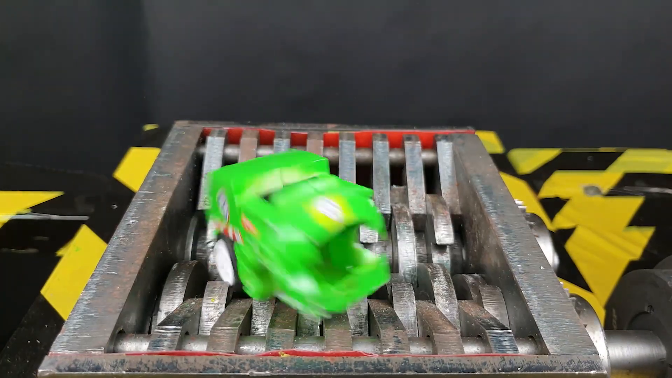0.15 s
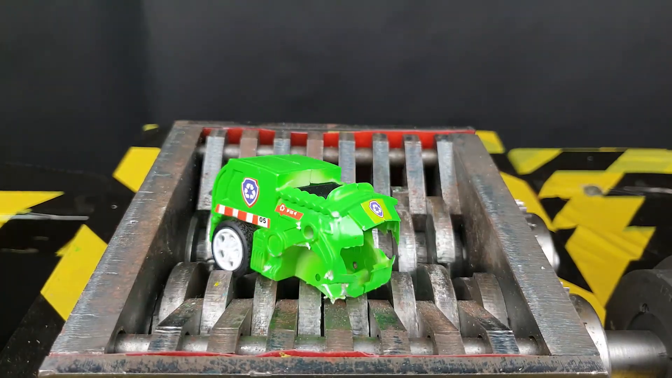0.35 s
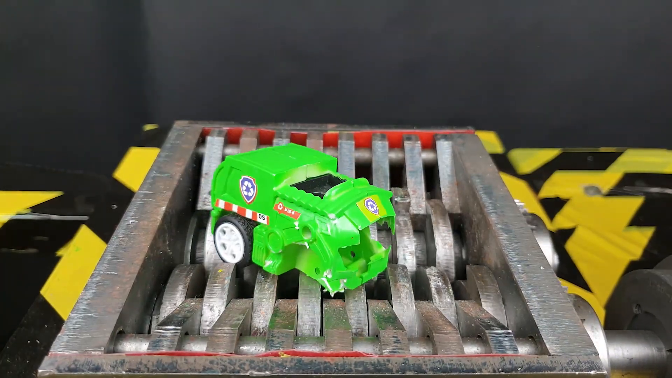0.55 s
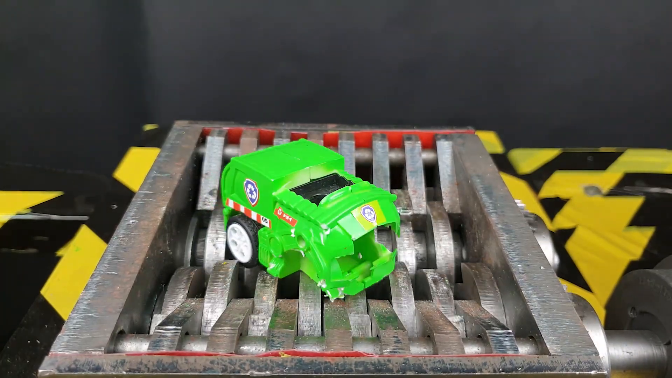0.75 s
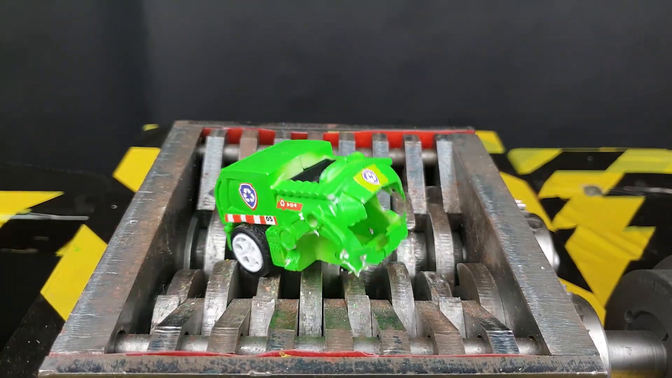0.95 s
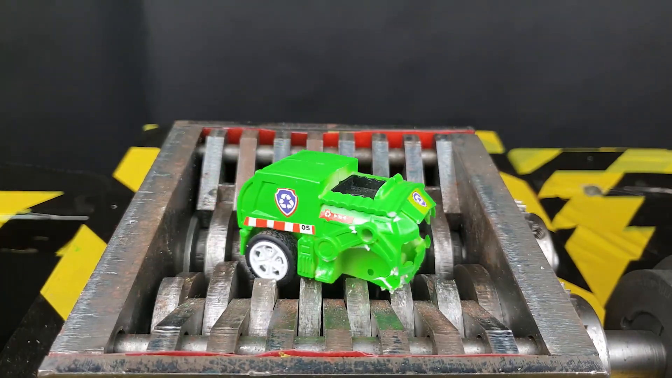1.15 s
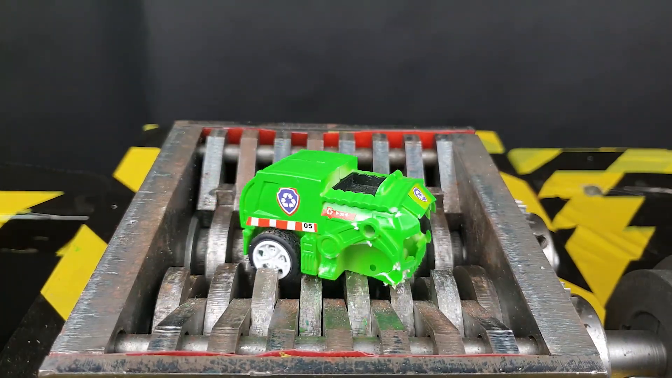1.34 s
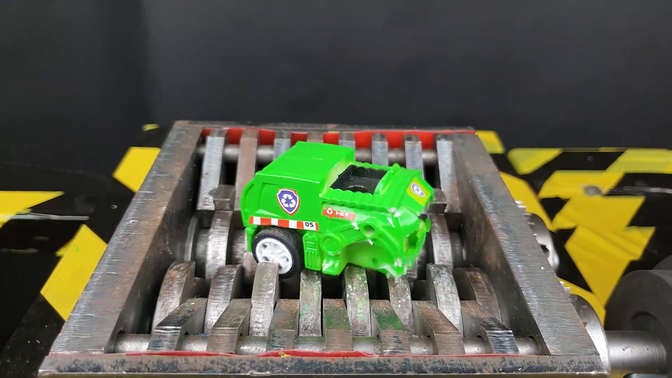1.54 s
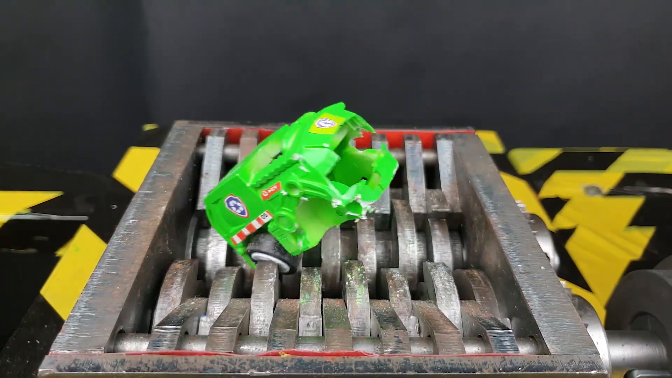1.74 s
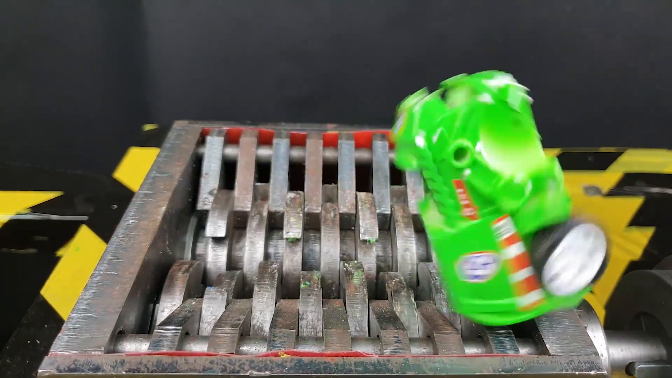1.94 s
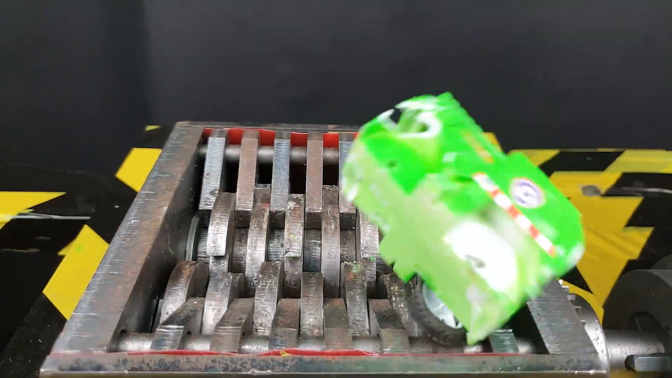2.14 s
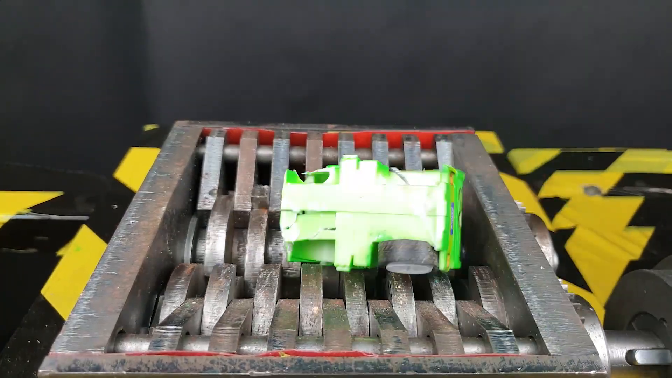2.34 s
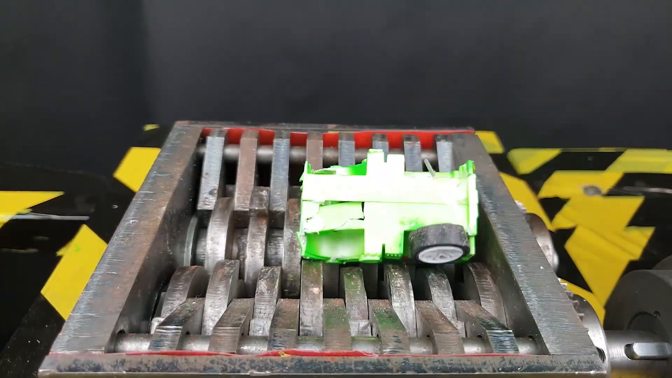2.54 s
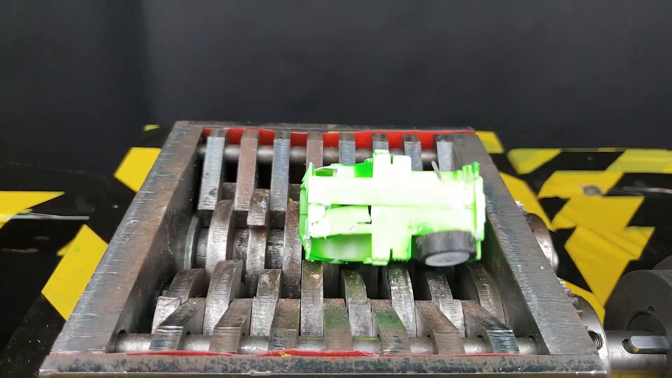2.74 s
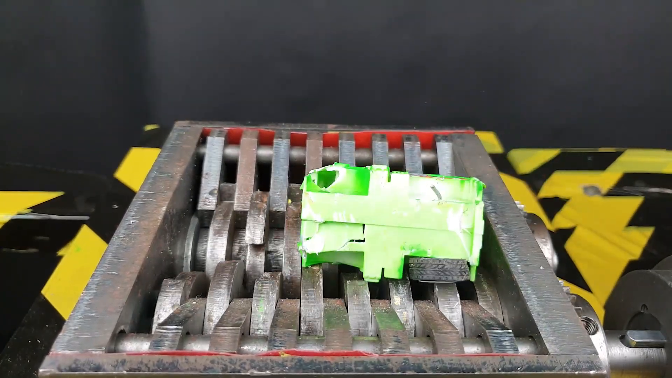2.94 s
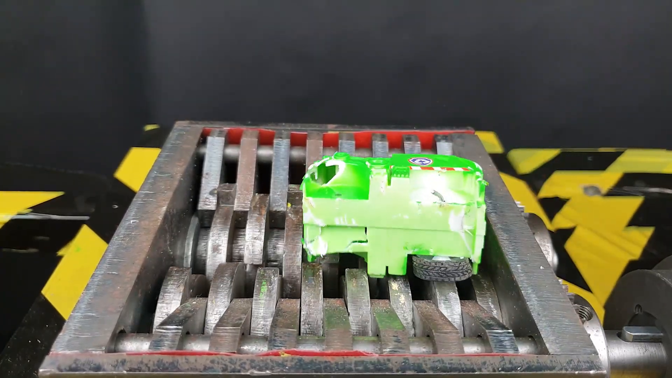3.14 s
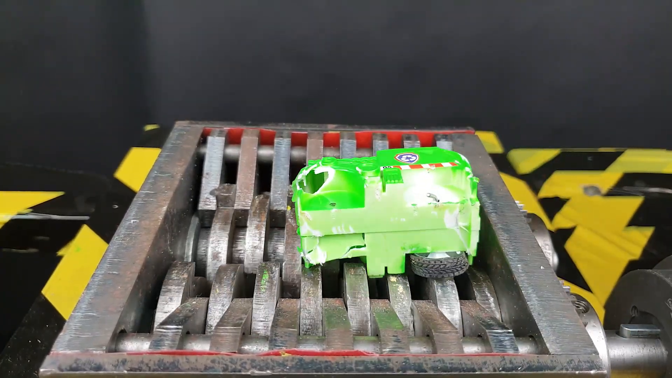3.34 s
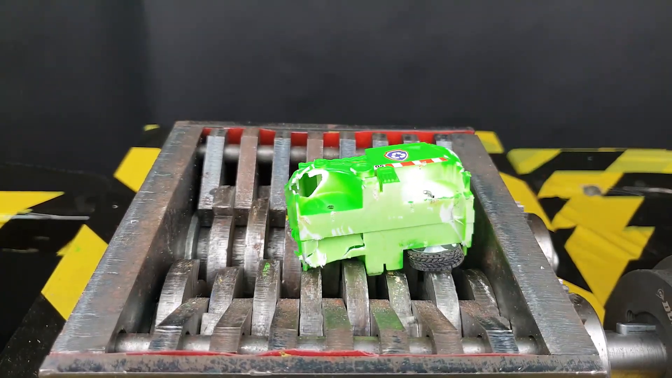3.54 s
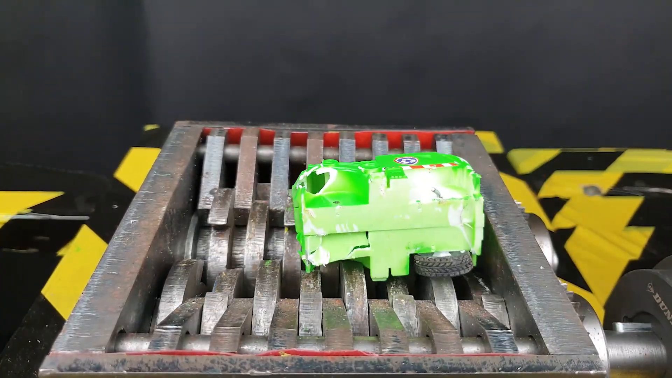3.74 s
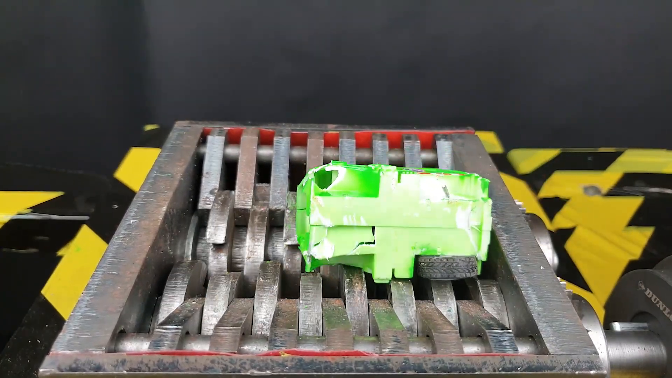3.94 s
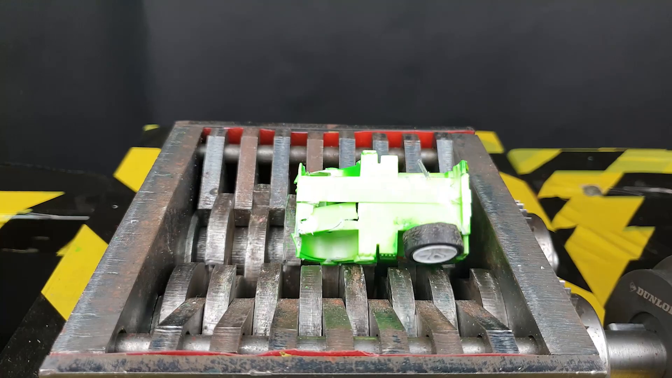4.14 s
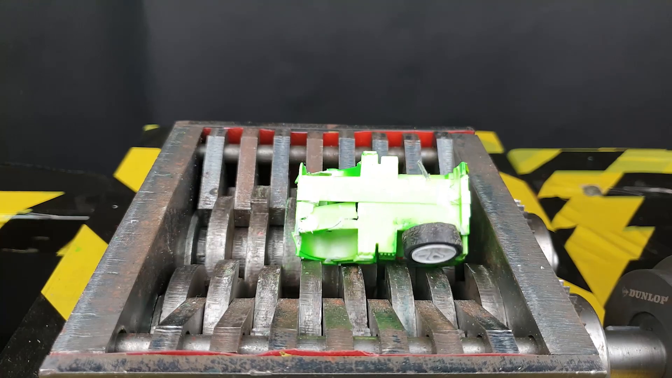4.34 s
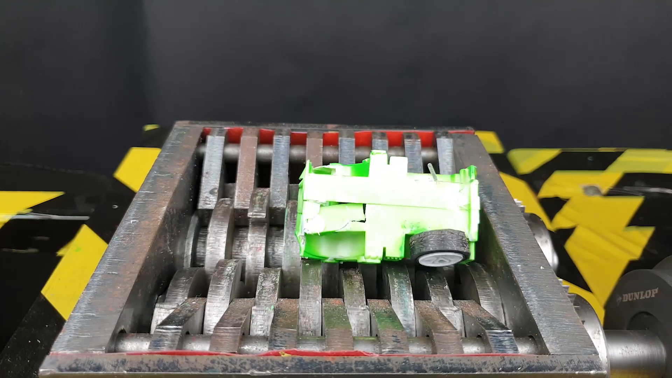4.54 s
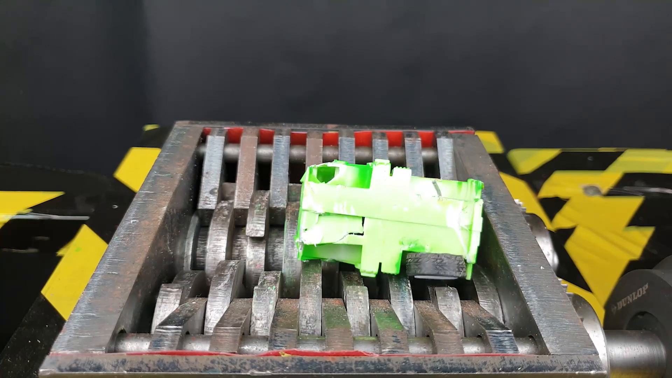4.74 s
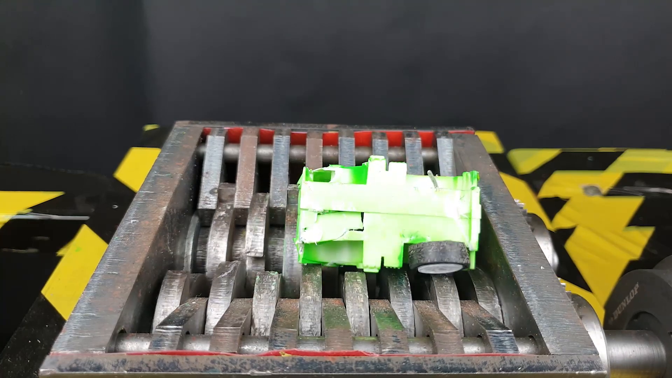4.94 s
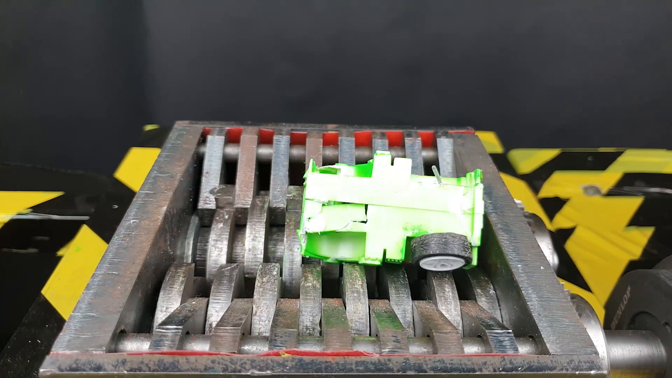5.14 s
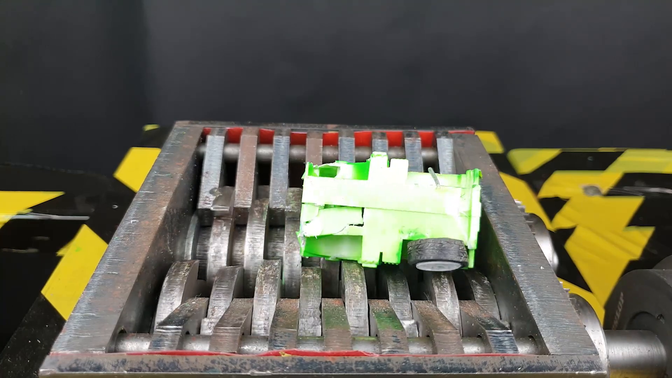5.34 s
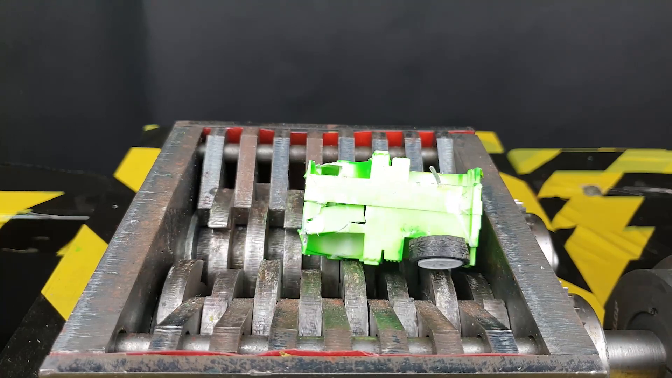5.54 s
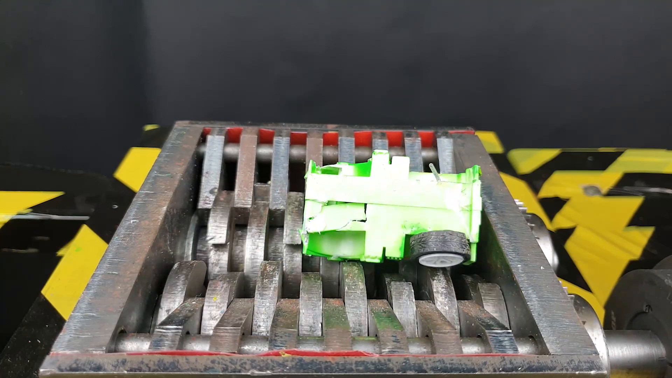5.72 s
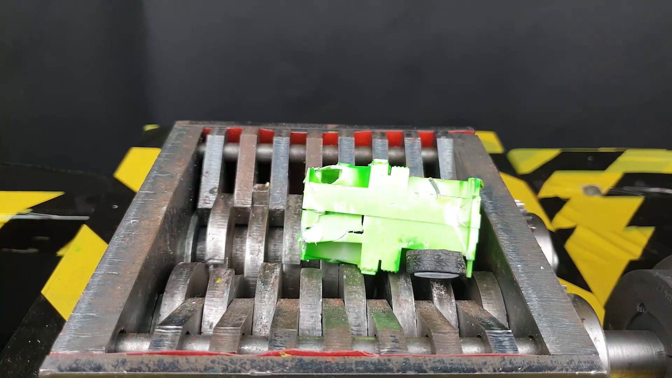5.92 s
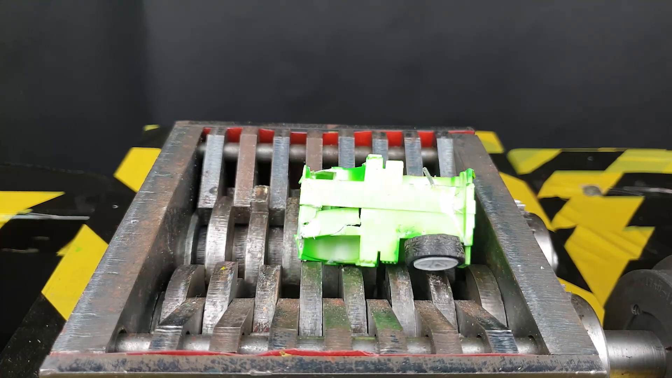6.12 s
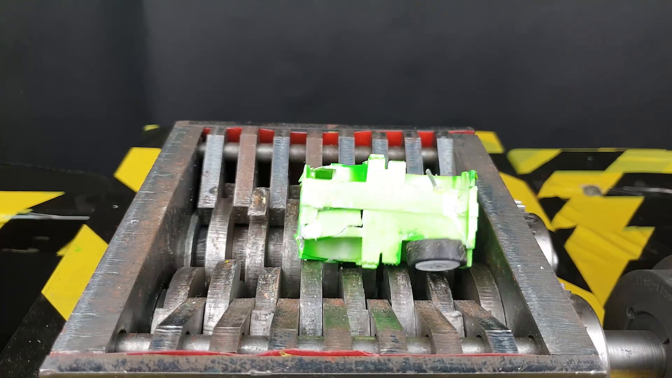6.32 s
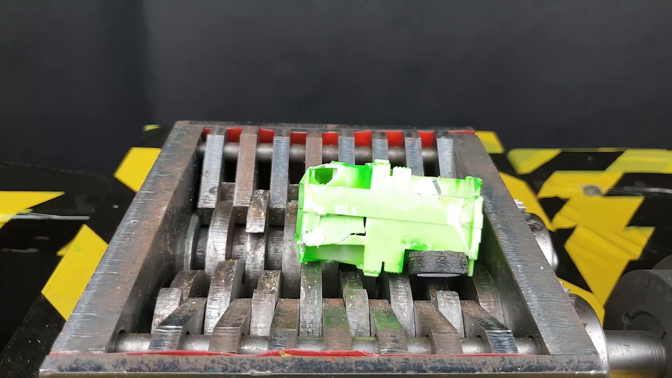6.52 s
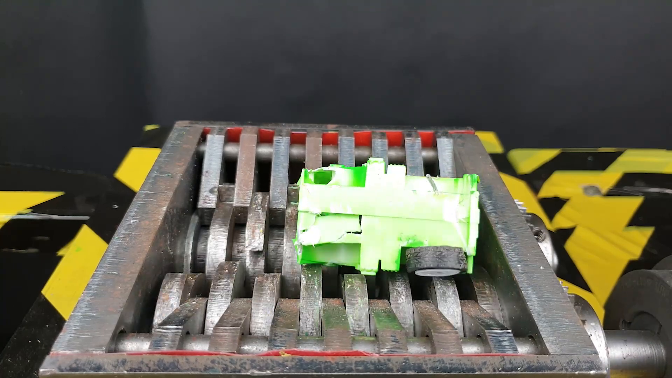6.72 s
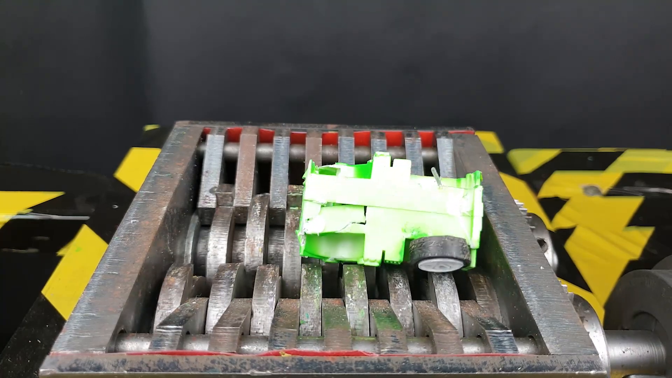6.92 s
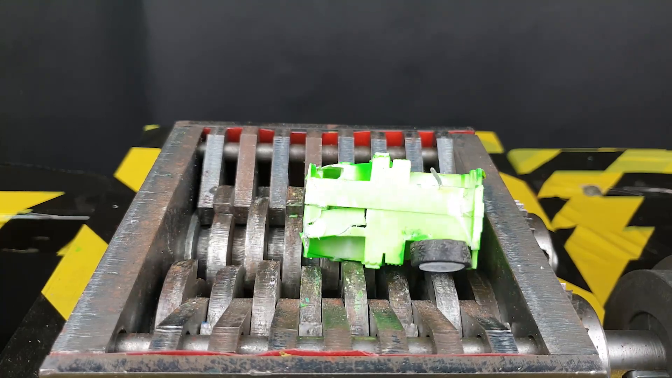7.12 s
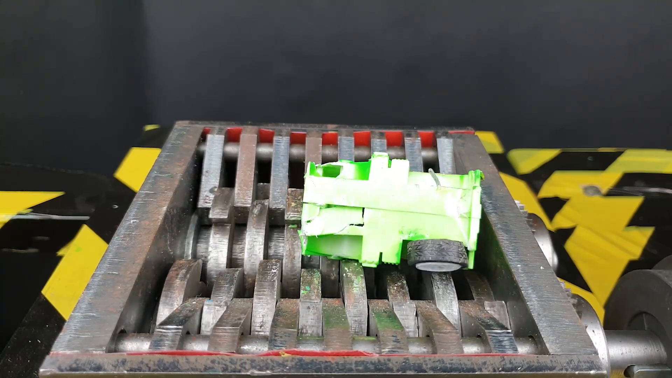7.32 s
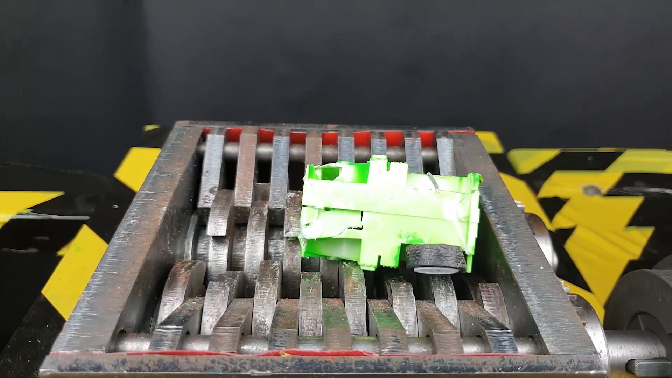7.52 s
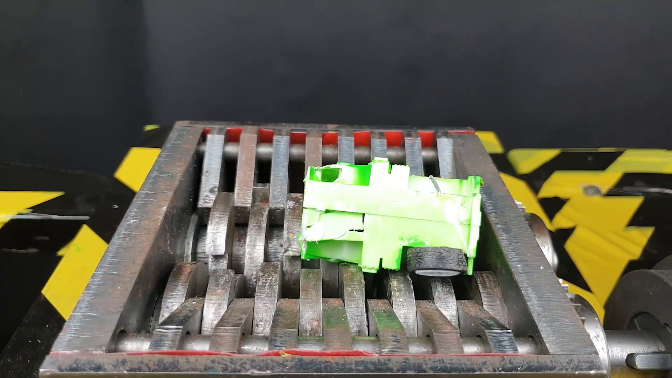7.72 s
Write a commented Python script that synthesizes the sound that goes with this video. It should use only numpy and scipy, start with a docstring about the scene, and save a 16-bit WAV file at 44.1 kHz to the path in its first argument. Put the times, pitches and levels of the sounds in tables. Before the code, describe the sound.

Hollow plastic snaps and clatters on slow steel cutters, loudest about two seconds in, then rubs and ticks over a droning, throbbing gearbox.

```python
"""A hollow plastic toy rides on the slow cutters of a twin-shaft shredder in a small workshop, 7.9 s.
Throughout, the motor hums, the gearbox throbs once a motor turn, and teeth rub the shell: clicks through its modes.
A crack comes at 0.2 s, then the loudest bites at 1.8-2.5 s: bursts of fractures that set the steel ringing.
Lighter knocks and singing drags follow; from 4.5 s the drive runs under heavier load."""
import sys
import numpy as np
from scipy import signal
from scipy.fft import rfft, irfft, next_fast_len
from scipy.io import wavfile
from scipy.ndimage import uniform_filter1d, map_coordinates

SR = 44100
rng = np.random.default_rng(int(sys.argv[2]) if len(sys.argv) > 2 else 0)


def unload_audio(sound):
    """Save the sound as a 16-bit wav file, at the path given as the first command line argument."""
    columns = np.transpose(np.atleast_2d(sound))
    # keep every value between -1 and 1, then stretch to whole-number steps
    steps = np.round(np.clip(columns, -1, 1) * 32767)
    wavfile.write(sys.argv[1], SR, steps.astype(np.int16))


N = 347060
TIME_S = np.arange(N) / SR

# blows and cracks on the shell: t/s, rms level over 10 ms/dB, brightness/(dB/octave), thud/dB, crumbling time/s
SHELL_BLOWS = [(0.135, -39, -2, -3, 0.0046), (.181, -18, 4, 4.5, .004), (.1925, -26.5, 1.5, 18, 0.0094),
               (0.224, -33.5, 3, 15, 0.0085), (.239, -36, -2, 1, 0.0081), (0.313, -28.5, -0.5, -14, 0.0027),
               (0.3517, -36, 5, 13, 0.0016), (0.3802, -40.5, -6, -23, 0.0019), (0.7336, -38, -4, 2, 0.0024),
               (0.8417, -47, 3, 0, .003), (.876, -38.5, -4.5, 19, 0.0066), (0.9564, -47.5, -1, -11, 0.0017),
               (1.0944, -35, -2.5, -7, 0.0031), (1.103, -40, 5, 12, 0.0015), (1.1395, -42.5, 0, 5, 0.004),
               (1.464, -32.5, -1.5, 17.5, 0.011), (1.554, -37.5, -4.5, 1, 0.0018),
               (1.6059, -37.5, 4.5, 17, 0.0017), (1.799, -32, -2.5, 13, 0.0037),
               (1.8146, -13.5, 8.5, -1, 0.0012), (1.8335, -7.5, 6, 12, 0.0029), (1.842, -15, 5.5, 6, 0.01),
               (1.849, -19, 4, 12, .004), (1.914, -13, 3.5, -19, 0.0012), (1.925, -22.5, 2, 0, 0.0023),
               (1.992, -30, 1, 13, 0.0027), (2.0224, -32.5, -2, 17, 0.0034), (2.0464, -37, 6, 18.5, 0.0037),
               (2.1261, -36, 0.5, 12, 0.0022), (2.145, -46, 3.5, 9, 0.0018), (2.267, -17, 3, 7.5, .0015),
               (2.3328, -28, 1.7, 7, 0.0016), (2.362, -33, -0.5, 11, 0.002),
               (2.3816, -33.5, -1.5, -6, .0025), (2.4082, -30.5, -2.5, -10, .003),
               (2.449, -34, 1.5, -15, .002), (2.4733, -21, 4, -6, 0.0019), (2.4946, -33, 1, -12, 0.0023),
               (2.524, -45, 0, -8, 0.0016), (2.535, -36.5, 0, -18, 0.0014),
               (2.709, -41, -4.5, -2.5, 0.0058), (2.8056, -38, 0, -16, 0.0028),
               (2.848, -42.5, -0.5, -15, 0.00082), (2.892, -46, -3.5, 7, .003),
               (3.1796, -42.5, -3, 7, .0034), (3.241, -33, -1.5, 19, 0.011), (3.3423, -52, 4, -0.5, .003),
               (3.634, -41, -5, 0, 0.0059), (3.702, -44.5, -7, 2, .005), (4.0595, -36.5, -6, 7, 0.0032),
               (4.075, -34.5, -2, -14, 0.0067), (4.145, -31.5, -6.5, -15.5, 0.0066),
               (4.4103, -42, 1.5, -5.5, 0.0026), (4.4288, -42.5, -7, 1, 0.0082),
               (4.4974, -44, -13, 0, .006), (4.5769, -37.5, -23, -9, 0.0012),
               (4.6582, -38.5, -9, 2, 0.0083), (4.905, -35.5, -4, -14, 0.0068),
               (5.261, -40.5, 0, 3, 0.0027), (5.4452, -37.5, -2.5, 9, 0.0054),
               (5.815, -40, -4, -14, 0.0045), (5.919, -42, -5, -12, 0.0045),
               (6.0085, -35.5, -4.5, -9, 0.0067), (6.387, -39.5, -3, 5, .004),
               (6.432, -42.5, 0, 11, 0.0026), (6.724, -42, -2, -4, .002), (6.7392, -39.5, -2.5, -23, .0055),
               (7.091, -39.5, 0, 6, 0.0043), (7.1216, -39.5, -8, 1, 0.0029), (7.174, -40.5, -3, 5, 0.013)]
# blows that ring the cutters: t/s, level/dB
STEEL_BLOWS = [(0.183, -31), (1.816, -26.5), (1.836, -12), (1.913, -33), (2.267, -40.5), (2.474, -42)]
# modes of cutter discs, hopper and frame: f/Hz, level re blow/dB, t60/s
STEEL_MODES = [(58, -16, 0.24), (85, -22.5, 0.4), (151.2, -20, 0.53), (396, -13.5, 0.3), (826, -19, 0.45),
               (3478, -18.5, 0.17), (3930, -17, .14), (4130, -11.5, .12), (4330, -13.5, 0.11),
               (4525, -6, .15), (4809, -2.5, 0.12), (5274, -11, 0.1), (5293, -9.5, 0.16), (6240, -20, 0.17),
               (6650, -18.5, .15), (6913, -12.5, 0.13), (7070, -4, .19), (8281, -22, .16),
               (12400, -21.5, .14)]
# modes of the hollow toy, before the scatter of each blow: f/Hz, width/Hz, level re broad response/dB
SHELL_MODES = [(1126, 62, 4), (1536, 220, 5), (1760, 70, 0.5), (2910, 130, -1), (3715, 170, 5),
               (4250, 220, 6), (6580, 170, 2), (8550, 240, -1)]
# lowest shell modes, singing while dragged: f/Hz before bending, width/Hz, relative level/dB
SINGING_MODES = [(1093.5, 13, 2), (1290, 70, -9.5), (1545, 32, -5), (1730, 90, -9)]
# a tooth catches the toy and drags along it: start t/s, length/s, relative scrape/dB, relative singing/dB
DRAGS = [(0.083, 0.082, -55, -70), (0.732, .19, -50.5, -58), (1.094, 0.065, -55, -49.5),
         (1.301, 0.072, -51, -71), (1.475, .13, -48, -59), (1.637, 0.19, -52.5, -73), (1.95, .12, -57, -50),
         (2.344, .2, -45, -43), (2.776, 0.11, -51, -47.5), (3.019, .11, -52, -47.5),
         (3.212, 0.14, -52.5, -53), (3.446, 0.29, -52.5, -53.5), (4.017, 0.2, -55.5, -53.5),
         (4.418, 0.22, -49.5, -57), (4.738, .1, -46.5, -49), (5.221, 0.075, -55, -52),
         (5.416, 0.049, -49, -54), (5.899, 0.21, -49.5, -51.5), (6.128, 0.13, -47, -49),
         (6.373, .14, -47, -53.5), (6.558, 0.11, -46.5, -51), (6.705, 0.061, -50.5, -45),
         (6.97, .08, -51, -69), (7.054, 0.084, -47.5, -55), (7.267, 0.047, -53.5, -48),
         (7.689, 0.24, -43.5, -47.5)]
# broad spectra, relative: f/Hz, level/dB
KNOCK_COLOUR = [(25, -13), (90, -10.5), (220, -12), (400, -8.5), (800, 0.5), (1500, 0), (2150, -4),
                (2950, -2.5), (3800, -3), (5200, -8.5), (8000, -11), (12000, -23), (13800, -40),
                (16000, -40)]
SCRAPE_COLOUR = [(100, -19), (500, 1.5), (900, 0.5), (1300, 2.5), (1750, -4), (2200, -4.5), (3100, -3.5),
                 (4200, -9), (5200, -15), (8000, -22), (12000, -38.5), (14000, -41.5)]
FIZZ_COLOUR = [(1000, -32.5), (4500, -10), (6500, -1), (8300, 1), (10500, -8), (12800, -8), (13300, -22.5),
               (16000, -27.5)]
RATTLE_COLOUR = [(25, -23), (60, -12), (130, -14), (220, -8.5), (270, -3), (335, -7.5), (400, 1),
                 (490, -13.5), (590, 3), (700, -5), (1000, -11.5), (1700, -11.5), (4000, -16.5),
                 (5500, -37)]
RUMBLE_COLOUR = [(15, -12), (35, -5), (60, 3), (95, -0.5), (200, -5), (500, -19.5), (1500, -59.5)]
TOP_HISS_COLOUR = [(9000, -42.5), (14400, -24.5), (14800, -16.5), (15350, -12.5), (15570, 2.5),
                   (15800, -25.5)]
# motor and gear tones: f/Hz, rms level at reference load/dB, waver/cycles
HUM_TONES = [(176.7, -58, .035), (263, -63, .15), (292.6, -64, .15), (301.4, -66.5, 0.13), (394, -59, 0.19),
             (462.5, -63, 0.32)]
# load on the drive: t/s, level/dB
DRIVE_LOAD = [(0, -50.5), (.15, -48.5), (.76, -49), (1.41, -46), (1.6, -42), (2.15, -52.5), (2.9, -50),
              (3.29, -49.5), (3.47, -51), (4.01, -48.5), (4.53, -42), (5.12, -42.5), (6.5, -42),
              (6.85, -45), (7.19, -42), (7.87, -44)]
# echo decay: f/Hz, t60/s
ROOM_DECAY = [(60, 0.91), (250, 0.67), (1000, 0.18), (4000, 0.21), (8000, 0.19), (15000, 0.31)]

MOTOR_HZ, GEAR_TEETH, TIGHT_SPOT_TURNS = 14.66, 37, 0.53
CATCH_S, RELEASE_S = 0.0061, 0.0095  # linear build-up; time constant of release
BAND_EDGE_HZ = 15800


def knocks(snap=0.7, clump_db=4, thud_hz=650, pivot_hz=1400, rise_s=0.031, snap_fade_s=0.0017,
           wall_hz=1720, wall_width_hz=380, wall_db=5, gentle_db=-40, size=4096):
    """Each blow is a snap and a dying run of tiny fractures, heard through the shell."""
    hz = np.fft.rfftfreq(size, 1 / SR)
    t_s = np.arange(size) / SR
    lead = size // 64
    octaves = np.log2(np.maximum(hz, pivot_hz) / pivot_hz)
    bass = 1 / (1 + (hz / thud_hz) ** 4)
    wall = 1 / (1 + ((hz - wall_hz) / wall_width_hz) ** 4)
    out = np.zeros(N)
    for start_s, db, bright, thud_db, crumble_s in SHELL_BLOWS + ticks():
        # each contact favours other modes and bends them a little
        spot, strain = rng.standard_normal((2, len(SHELL_MODES)))
        shell = shell_response(KNOCK_COLOUR, weights_db=3.9 * spot, stretch=1 + 0.03 * strain)[1]

        sign, clump = rng.standard_normal((2, size))
        decay_s = max(crumble_s, 1 / SR)
        age = t_s / decay_s
        rise = 1 - np.exp(-age * rise_s / decay_s)  # long crumbles build up more slowly
        fractures = sign * amp(clump_db * clump) * np.exp(-age) * rise
        fractures /= np.linalg.norm(fractures)
        fractures[0] -= snap * np.exp(-crumble_s / snap_fade_s)  # short blows get more snap

        force = rfft(np.roll(fractures, lead))
        force /= np.sqrt(uniform_filter1d(abs(force) ** 2, size=90))  # broadly white, ragged in detail
        hard = np.clip((db - gentle_db) / 20, 0, 1)  # hard blows flex a whole wall of the toy
        tilt_db = bright * octaves + thud_db * bass + wall_db * hard * wall
        hit = irfft(force * shell * amp(tilt_db))
        hit_rms = np.sqrt(np.mean(hit[lead:][:SR // 100] ** 2))
        add(out, start_s - lead / SR, amp(db) * hit / hit_rms)
    return out


def ticks(above_db=2, spread_db=1.5, bright=-3.0, thud_db=-4, crumble_s=0.0027, count=3):
    """Each drag jumps at random moments: light knocks, levelled from its scrape."""
    blows = []
    for start_s, length_s, scrape_db, _ in DRAGS:
        for _ in range(count):
            tick_s = start_s + length_s * rng.random()
            tick_db = scrape_db + above_db + spread_db * rng.standard_normal()
            blows.append((tick_s, tick_db, bright, thud_db, crumble_s))
    return blows


def shell_response(colour, weights_db=0, stretch=1, size=4096):
    """Causal spectrum of a click on the toy: a broad colour with the shell's modes on top."""
    hz = np.fft.rfftfreq(size, 1 / SR)
    mode_hz, width_hz, db = np.transpose(SHELL_MODES)
    detuning = 2 * (hz[:, None] - mode_hz * stretch) / width_hz
    peaks = (amp(db + weights_db) ** 2 / (1 + detuning ** 2)).sum(1)
    log_gain = np.log(amp(read(colour, hz)) * np.sqrt(1 + peaks))
    circle = np.concatenate([log_gain, log_gain[-2:0:-1]])
    minimum_phase = np.exp(np.conj(signal.hilbert(circle)))
    return hz, minimum_phase[:len(hz)]


def cutters(onset_s=0.00093, chatter_db=4.5, wobble_rad=0.81):
    """Hard bites leave the steel ringing; plastic chattering against it makes each mode flutter."""
    t_s = np.arange(SR // 2) / SR
    onset = 1 - np.exp(-t_s / onset_s)
    out = np.zeros(N)
    for start_s, blow_db in STEEL_BLOWS:
        for hz, db, t60_s in STEEL_MODES:
            flutter = unit(uniform_filter1d(rng.standard_normal(len(t_s)), size=500))
            ring = np.sin(2 * np.pi * (hz * t_s + rng.random()) + wobble_rad * flutter[::-1])
            ring_db = blow_db + db - 60 * t_s / t60_s + chatter_db * flutter
            add(out, start_s, ring * amp(ring_db) * onset)
    return out


def rubbing(scrape_db=-2.5, crackle_db=-5, fizz_db=-2, judder_db=2.0, rasp_db=1.5, split_hz=2100):
    """Teeth stick and slip: dense clicks and sparse crackle in the shell, a fine fizz at the contact."""
    scrape, fizz = contact()
    judder = judder_db * drift(per_s=78)
    dense = unit(grains(per_s=5000, spread_db=3.0) * amp(judder))
    crackle = unit(grains(per_s=260, spread_db=5.0) * amp(2 * drift(per_s=7.6)))
    clicks = dense + amp(crackle_db) * crackle
    shell_impulse = irfft(shell_response(SCRAPE_COLOUR)[1])
    slips = unit(signal.oaconvolve(clicks, shell_impulse)[:N + len(shell_impulse) - 1])[:N]

    # edges rasp, flat faces rub dully
    dull = signal.sosfiltfilt(signal.butter(2, split_hz, fs=SR, output="sos"), slips)
    slips = dull + (slips - dull) * amp(rasp_db * drift(per_s=51))
    fine = coloured(grains(per_s=13000, spread_db=5.0), FIZZ_COLOUR)
    return slips * scrape * amp(scrape_db) + fine * fizz * amp(fizz_db + 0.3 * judder)


def contact(rest_db=-51.0, rest_slope=0.84, fizz_rest_db=-64, fizz_slope=0.76, fizz_drag_db=-16):
    """Scrape and fizz strength: the toy always rests on the cutters, rubs harder under load and in drags."""
    drag, load_db = dragging()[0], load()
    scrape = np.hypot(drag, amp(rest_db + rest_slope * load_db))
    fizz = np.hypot(drag * amp(fizz_drag_db), amp(fizz_rest_db + fizz_slope * load_db))
    return scrape, fizz


def dragging():
    """Strength of scrape and singing: every drag catches, holds and lets go."""
    scrape, sing = np.zeros((2, N))
    for start_s, length_s, scrape_db, sing_db in DRAGS:
        t_s = np.arange(0, length_s + 10 * RELEASE_S, 1 / SR)
        release = np.exp(-np.maximum(t_s - length_s, 0) / RELEASE_S)
        grip = np.minimum(t_s / CATCH_S, 1) * release
        add(scrape, start_s, amp(scrape_db) * grip)
        add(sing, start_s, amp(sing_db) * grip)
    return scrape, sing


def singing(sing_db=-2, rest_db=-64, bend=0.004):
    """Small slips keep the shell's low modes ringing; their pitch bends as the plastic flexes."""
    flex = 1 + bend * drift(per_s=16)
    out = np.zeros(N)
    for hz, width_hz, db in SINGING_MODES:
        turn = np.exp(2j * np.pi * np.cumsum(hz * flex) / SR)
        keep = np.exp(-np.pi * width_hz / SR)  # decay per sample
        swing = signal.lfilter([1], [1, -keep], grains(per_s=160, spread_db=4.5) / turn)
        out += amp(db) * unit((swing * turn).imag)
    return out * np.hypot(dragging()[1] * amp(sing_db), amp(rest_db + 0.7 * load()))


def drive(gear_db=-48, rattle_db=-51, rumble_db=-2, hiss_db=-73, throb=0.46, uneven_db=2.0):
    """Motor hum, gear mesh and rattle swelling at a tight spot in every turn, rumble and thin top hiss."""
    load_db = load()
    turns = MOTOR_HZ * TIME_S + 0.026 * drift(per_s=6.2)
    past_tight = 2 * np.pi * (turns - TIGHT_SPOT_TURNS)
    tight = np.cos(past_tight)
    swell = unit(np.exp(throb * tight + 0.23 * np.cos(2 * past_tight)))
    mesh_cycles = GEAR_TEETH * MOTOR_HZ * TIME_S + 0.041 * drift(per_s=1.7) + 0.085 * drift(per_s=100)
    mesh = np.sqrt(2) * np.sin(2 * np.pi * mesh_cycles)
    gears = mesh * swell * amp(gear_db + 0.95 * load_db + uneven_db * drift(per_s=20))

    hum = np.zeros(N)
    for hz, db, waver in HUM_TONES:
        tone_db = db + 0.91 * load_db + 6.8 * waver * drift(per_s=9)
        cycles = hz * TIME_S + waver * drift(per_s=6)
        hum += np.sqrt(2) * amp(tone_db) * np.sin(2 * np.pi * cycles)

    rattle_level_db = rattle_db + 0.85 * load_db + 1.3 * tight
    rattle = coloured(rng.standard_normal(N), RATTLE_COLOUR) * amp(rattle_level_db)
    rumble = coloured(rng.standard_normal(N), RUMBLE_COLOUR) * shaking() * amp(rumble_db)
    top_hiss = coloured(rng.standard_normal(N), TOP_HISS_COLOUR) * amp(hiss_db + 0.5 * load_db)
    return gears + hum + rattle + rumble + top_hiss


def load(reference_db=-44):
    """Load on the drive in dB re reference load, sample by sample."""
    t_s, level_db = np.transpose(DRIVE_LOAD)
    return np.interp(TIME_S, t_s, level_db) - reference_db


def shaking(idle_db=-63, load_slope=0.54, jolt_db=-39, thud_share=0.52, t60_s=0.82):
    """The frame trembles with the load; each blow adds a jolt that slowly dies away."""
    power = amp(idle_db + load_slope * load()) ** 2
    fade = amp(-60 * TIME_S[:SR] / t60_s)
    for start_s, db, _, thud_db, _ in SHELL_BLOWS:
        jolt = amp(db + thud_share * thud_db + jolt_db) * fade
        add(power, start_s, jolt ** 2)
    return np.sqrt(power)


def workshop(x, gap_s=0.002):
    """Dense echoes from hopper and walls: noise with each band dying at its own speed."""
    hz, t_s, bands = signal.stft(rng.standard_normal(SR), SR, nperseg=256)
    decay = amp(-60 * t_s / read(ROOM_DECAY, hz)[:, None])
    tail = signal.istft(bands * decay, SR, nperseg=256)[1]
    tail *= 1 - np.exp(-(np.arange(len(tail)) / SR / gap_s) ** 2)
    return signal.fftconvolve(x, tail / np.linalg.norm(tail))[:N]


def grains(per_s, spread_db):
    """Random clicks, a few much larger than the rest."""
    size = amp(spread_db * np.minimum(rng.exponential(1, N), 4)) * rng.choice([-1, 1], N)
    return size * (rng.random(N) < per_s / SR)


def drift(per_s):
    """Smooth random curve of rms 1 through per_s random points a second."""
    points = rng.standard_normal(4096)
    curve = map_coordinates(points, [TIME_S[::32] * per_s], order=3, mode="wrap")
    return unit(curve).repeat(32)[:N]


def coloured(x, colour):
    """Filters by a broad spectrum; rms 1."""
    size = next_fast_len(N)
    gain = amp(read(colour, np.fft.rfftfreq(size, 1 / SR)))
    return unit(irfft(rfft(x, size) * gain, size)[:N])


def read(points, hz):
    """Interpolates a frequency table on a log-frequency axis."""
    f_hz, value = np.transpose(points)
    return np.interp(np.log(hz + 1), np.log(f_hz + 1), value)


def add(mix, start_s, sound):
    """Mixes a sound in, in place."""
    part = mix[max(round(start_s * SR), 0):][:len(sound)]
    part += sound[:len(part)]


def amp(db):
    """Decibels to gain."""
    return 10 ** (np.asarray(db) / 20)


def unit(x):
    """Scales to rms 1."""
    return x / np.sqrt(np.mean(x ** 2) + 1e-20)


def scene(room_db=-10):
    """The blows with their echo, over the rubbing and the running machine."""
    blows = knocks() + cutters()
    echo = amp(room_db) * workshop(blows)
    return (blows + echo + rubbing() + singing() + drive())[None]


def record(dry):
    """Overload clips the peaks at full scale; a linear-phase low-pass then limits the band."""
    clipped = np.clip(dry, -1, 1)
    low_pass = signal.firwin(511, BAND_EDGE_HZ, window=("kaiser", 9), fs=SR)
    return signal.oaconvolve(clipped, low_pass[None], "same")


dry = scene()
out = record(dry)
unload_audio(out)
```